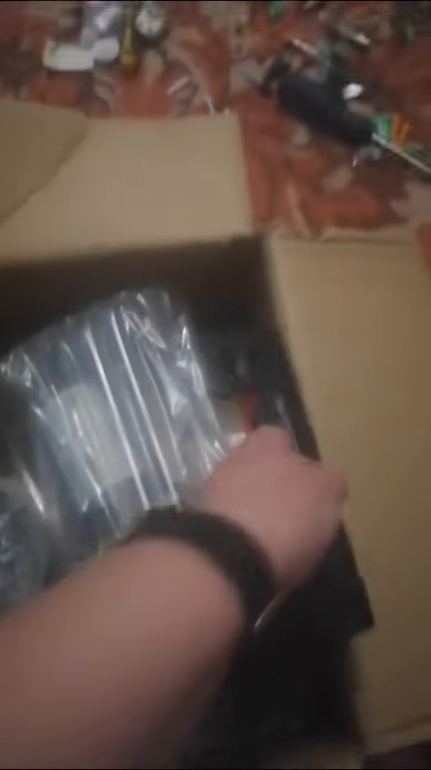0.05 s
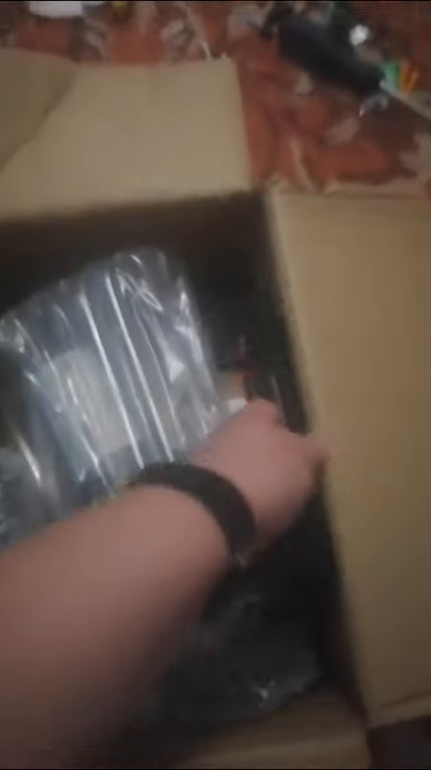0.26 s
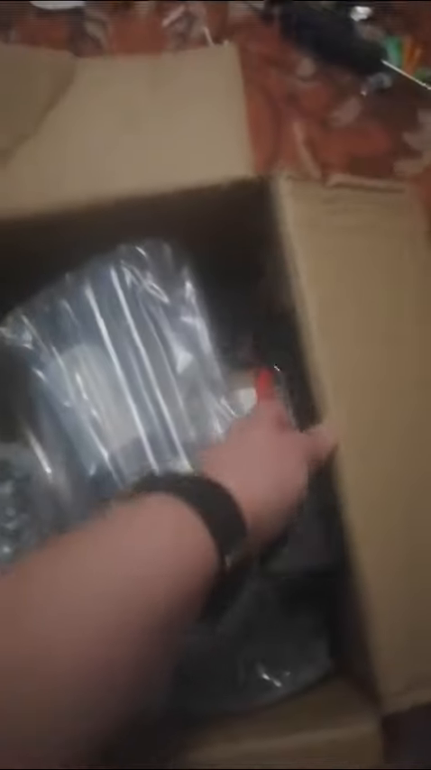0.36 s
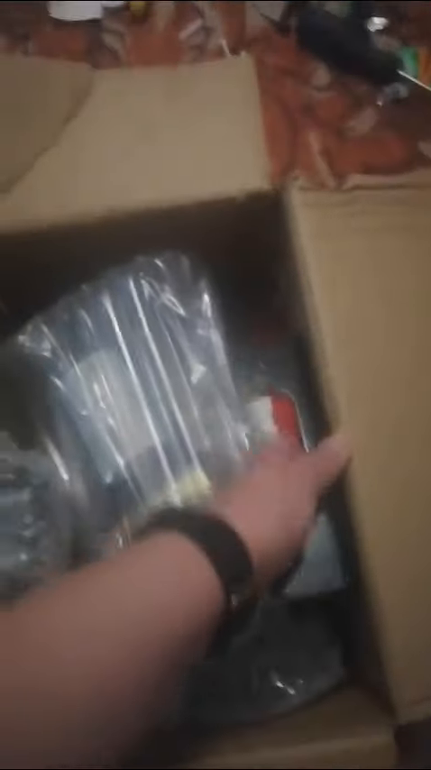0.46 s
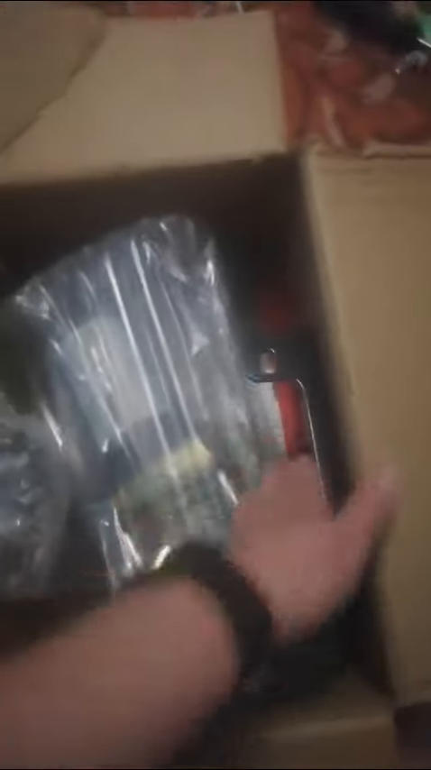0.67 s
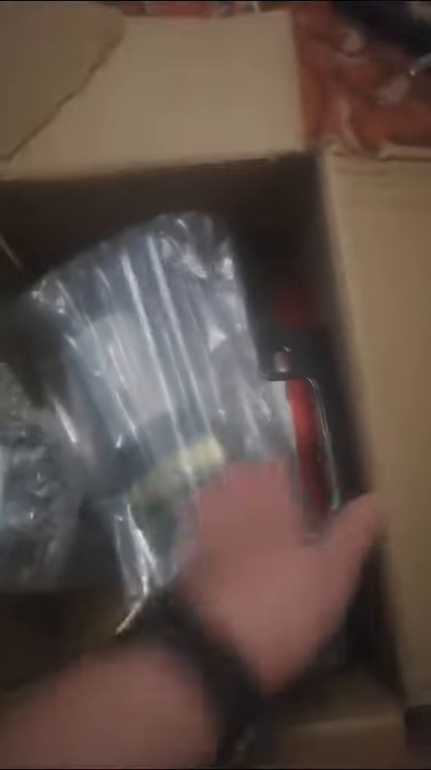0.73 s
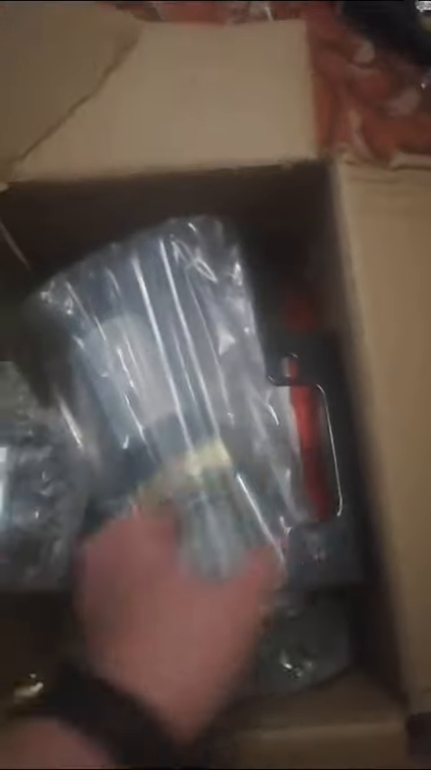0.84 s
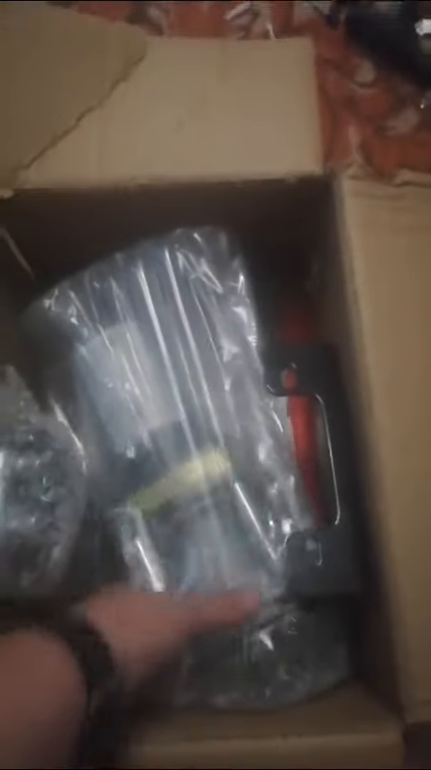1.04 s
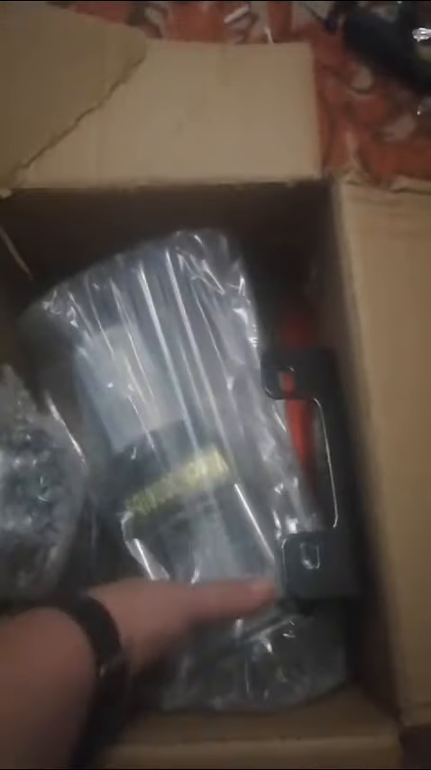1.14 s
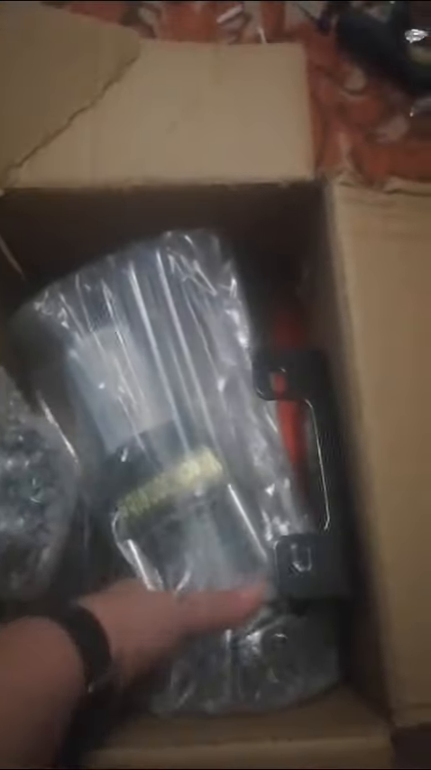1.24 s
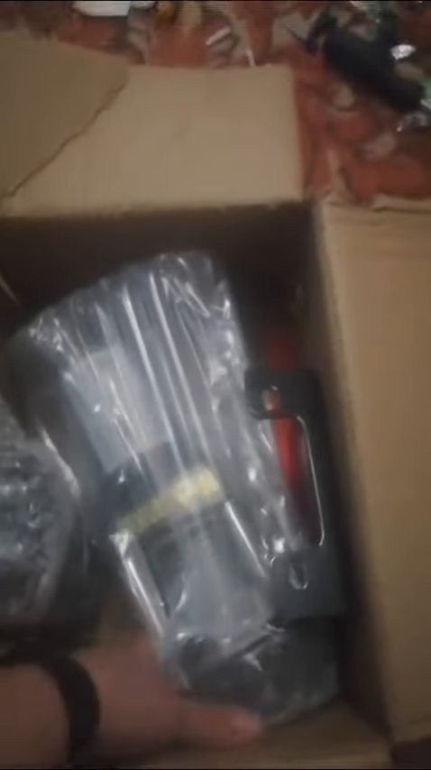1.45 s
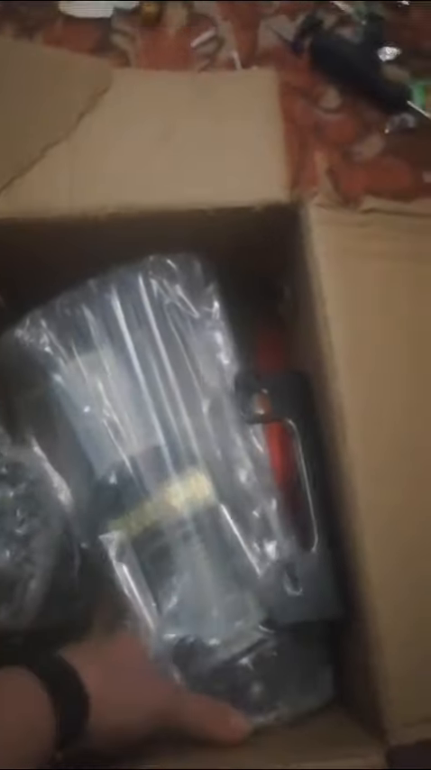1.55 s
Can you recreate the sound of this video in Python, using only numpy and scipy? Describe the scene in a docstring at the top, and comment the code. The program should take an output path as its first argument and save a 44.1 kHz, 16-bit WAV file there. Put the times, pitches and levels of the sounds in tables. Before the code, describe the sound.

Cardboard box knocked by a hand: hollow thumps first, the heaviest followed by a sharp crack and short metal clink, then plastic film rustling and snapping, close stereo microphone in a small quiet room.

```python
"""In a quiet room, a hand shifts wrapped goods in a cardboard box close to a two-port microphone.
A faint low sine swells and fades over steady filtered-noise air. Clumped random clicks through filter
banks make film rustle and card rub. Blows ring the box walls and crack as noise bursts, coloured bursts
make short film snaps and one light knock, and a metal part clinks as ringing modes. Feedback delays
answer the hits."""
import sys
import numpy as np
from scipy import signal
from scipy.fft import rfft, irfft, next_fast_len
from scipy.io import wavfile

SR = 44100
rng = np.random.default_rng(int(sys.argv[2]) if len(sys.argv) > 2 else 0)


def boost_factor(decibels):
    """Convert a level in decibels to a linear amplitude factor."""
    exponent = np.asarray(decibels, float) / 20
    return 10 ** exponent


def store_pcm(level_fs):
    """Save levels as 16-bit WAV."""
    pcm = np.round(np.clip(level_fs, -1, 1) * 32767).astype(np.int16)
    wavfile.write(sys.argv[1], SR, np.atleast_2d(pcm).T)


N = 70560  # samples, 1.6 s


def rms_one(x):
    """Scale to rms 1."""
    return x / np.sqrt(np.mean(x ** 2) + 1e-20)


def in_time(rows):
    """Read the columns of a time curve at every sample."""
    seconds, *columns = np.transpose(rows)
    return [np.interp(np.arange(N) / SR, seconds, column) for column in columns]


def at_hz(points, hz):
    """Read a spectrum on a log frequency axis."""
    point_hz, values = np.array(points).T
    return np.interp(np.log(hz), np.log(point_hz), values)


def drift(corner_hz):
    """Slow random wander with rms 1: noise through two equal low-pass poles."""
    pole = np.exp(-2 * np.pi * corner_hz / SR)
    noise = rng.standard_normal(2 * N)
    settled = signal.lfilter([1], [1, -2 * pole, pole * pole], noise)[N:]
    return rms_one(settled)


def band_pass(x, low_hz, high_hz):
    """Keep what lies between two frequencies."""
    return signal.sosfilt(signal.butter(2, [low_hz, high_hz], "band", fs=SR, output="sos"), x)


def ring(clicks, hz, t60_s):
    """A damped mode: a unit click starts a decaying sine of height 1."""
    radius = boost_factor(-60 / (t60_s * SR))
    w = 2 * np.pi * hz / SR
    return signal.lfilter([0, np.sin(w)], [1, -2 * radius * np.cos(w), radius ** 2], clicks + 1e-18)


def burst(t60_s, hz, q):
    """Dying noise through one broad resonance, peak 1, drawn separately for each port."""
    fade = boost_factor(-60 * np.arange(2048) / SR / t60_s)
    noise = rng.standard_normal((2, 2048)) * fade
    out = signal.lfilter(*signal.iirpeak(hz, max(q, 3 * hz / SR), fs=SR), noise)
    return out / np.abs(out).max()


def add(out, start_s, sound):
    """Mix a short stereo sound in at its start time."""
    i = int(start_s * SR)
    out[:, i:i + sound.shape[1]] += sound[:, :N - i]


def grains(per_s, spread_db, clump_db):
    """Random clicks of uneven size, in two pairs of draws that thicken and swell in the same clumps."""
    clump = boost_factor(clump_db * drift(60.0))
    sizes = boost_factor(spread_db * np.minimum(rng.exponential(1, (2, 2, N)), 4))
    signs = rng.choice([-1, 1], (2, 2, N))
    born = rng.random((2, 2, N)) < per_s * clump / SR
    return clump * sizes * signs * born + 1e-18


# Left-right likeness of the noisy sounds. Each row: frequency in Hz, likeness (1 is the same in both).
LEFT_RIGHT_LIKENESS = [(30, 0.5), (250, 1), (800, 0.023), (16000, 0.007)]


def bands(spectrum, source, patchy_db):
    """Band-pass bank that gives noise or grains a spectrum, per-band flicker and stereo width; rms 1."""
    out = 0
    edges = np.geomspace(25, 17000, num=26)
    flicker = [drift(17.0) for _ in range(5)]
    for k, (low, high) in enumerate(zip(edges, edges[1:])):
        hz = np.sqrt(low * high)
        mid, side = band_pass(source[k % 2], low, high)  # neighbouring bands use different draws
        alike = np.clip(at_hz(LEFT_RIGHT_LIKENESS, hz), -1, 1)
        stereo = np.sqrt(1 + alike) * mid + np.sqrt(1 - alike) * side * [[1], [-1]]
        out = out + boost_factor(at_hz(spectrum, hz) + patchy_db * flicker[k % 5]) * stereo
    return rms_one(out)


# Faint low tone that swells and fades. Each row: time in seconds, frequency in Hz, rms level in dB.
TONE_CURVE = [(0, 251, -58), (.045, 266, -60), (.085, 257.6, -52), (.13, 268, -65), (.19, 248, -101)]


def low_tone():
    """A sine of gliding pitch, its phase the running sum of its frequency, dies away."""
    hz, db = in_time(TONE_CURVE)
    return np.sqrt(2) * boost_factor(db) * np.sin(2 * np.pi * np.cumsum(hz) / SR)


# Colour of the quiet air. Each row: frequency in Hz, relative level in dB per Hz.
AIR_SPECTRUM = [(60, 18), (450, -46), (1800, -51), (3100, 4), (5000, 2.5), (16000, -25.5)]


def air():
    """Steady random noise, coloured band by band, with a slight flicker."""
    level_db = -66.5  # rms
    return boost_factor(level_db) * bands(AIR_SPECTRUM, rng.standard_normal((2, 2, N)), patchy_db=1.5)


# Movement of the hand. Each row: time in seconds, film rustle rms in dB, card rub rms in dB.
HAND_MOVES = [(.22, -69, -64.5), (.34, -56.5, -45), (.42, -43.5, -42), (.47, -51, -38), (.57, -58, -47),
              (.66, -43.5, -33.5), (.70, -44, -36.5), (.78, -65, -47.5), (.91, -50, -50.5), (.96, -61, -48),
              (1.0, -64.5, -64.5), (1.07, -63.5, -57), (1.12, -50, -54.5), (1.2, -46, -45.5),
              (1.31, -45, -56), (1.365, -55, -49.5), (1.39, -39.5, -47), (1.44, -51.5, -53.5),
              (1.49, -40.5, -49), (1.6, -54, -51.5)]
# Colour of the rustling film. Each row: frequency in Hz, relative level in dB per Hz.
FILM_SPECTRUM = [(900, 10), (1500, 6.5), (2400, 13), (3600, 1.5), (5000, 8), (8200, 4), (10900, -1.5),
                 (15000, -0.5)]
# Colour of card rubbing on card. Each row: frequency in Hz, relative level in dB per Hz.
CARD_SPECTRUM = [(60, -19), (110, -5), (370, 4), (900, -6.5), (2500, -34.5)]


def rubbing():
    """Film rustles and card rubs as the hand moves: many tiny clicks, each material with its colour."""
    film_db, card_db = in_time(HAND_MOVES)
    film_grains = grains(per_s=4000, spread_db=4, clump_db=2)
    card_grains = grains(per_s=1500, spread_db=3, clump_db=2)
    film = bands(FILM_SPECTRUM, film_grains, patchy_db=0.5)
    card = bands(CARD_SPECTRUM, card_grains, patchy_db=3.5)
    return boost_factor(film_db) * film + boost_factor(card_db) * card


# Blows on the box. Each row: start in seconds, strike level on the walls in dB,
# pitch the walls favour in Hz, crack level in dB.
BOX_BLOWS = [(0.23, -18.5, 197.4, -28), (.286, -23.5, 190, -36.5), (.309, -6.5, 153.6, -20.5),
             (0.487, -17, 199, -28.5), (0.6016, 0.5, 127.8, -21), (0.6087, -22, 253, -22),
             (.654, -28, 252, -32), (0.685, -16, 400, -12.5), (0.7251, -24, 522, -26),
             (1.088, -30, 400, -22), (1.109, -30, 424, -27), (1.1131, -32, 335, -24.5),
             (1.207, -33, 575, -35)]
# Modes of the box walls. Each row: frequency in Hz, relative level in dB, 60 dB decay time in seconds.
WALL_MODES = [(147.5, -24, 0.096), (156.8, -10, 0.16), (191.6, 0.5, 0.16), (256.3, -2, 0.18),
              (309.6, 4, 0.071), (400, -1.5, 0.026), (490, -1, 0.047), (618, -1.5, 0.046), (777, 2, 0.024)]


def box():
    """Each blow rings the wall modes nearest its pitch most, and cracks at the contact."""
    favour_db_per_oct2, favour_floor_db, mode_spread_db = 134, -24, 2
    wall_low_hz, contact_hz = 111.5, 1050  # range the wall ring keeps
    crack_t60_s, crack_hz, crack_top_hz = 0.027, 930, 4080
    start_s, strike_db, pitch_hz, crack_db = np.transpose(BOX_BLOWS)
    chance = rng.standard_normal((len(start_s), len(WALL_MODES)))

    walls = np.zeros(N)
    for k, (hz, mode_db, t60_s) in enumerate(WALL_MODES):
        octaves_off = np.log2(hz / pitch_hz)
        favour_db = np.maximum(-favour_db_per_oct2 * octaves_off ** 2, favour_floor_db)
        clicks = np.zeros(N)
        click_db = strike_db + mode_db + favour_db + mode_spread_db * chance[:, k]
        clicks[(start_s * SR).astype(int)] = boost_factor(click_db)
        walls -= ring(clicks, hz, t60_s)
    walls = band_pass(walls, wall_low_hz, contact_hz)

    cracks = np.zeros((2, N))
    for s, db in zip(start_s, crack_db):
        add(cracks, s, boost_factor(db) * burst(crack_t60_s, crack_hz, q=0.55))
    cracks = signal.lfilter(*signal.butter(1, crack_top_hz, fs=SR), cracks)
    return walls + cracks


# Short snaps of film, and one light knock at 0.864 s.
# Each row: start in seconds, level of the coloured burst in dB, its pitch in Hz.
SNAPS_AND_KNOCK = [(0.557, -26.5, 4750), (0.671, -22.5, 7450), (0.864, -35.5, 2130), (1.264, -28.5, 7740),
                   (1.278, -27, 7800), (1.298, -25.5, 2240), (1.31, -22, 5220), (1.38, -32.5, 7160),
                   (1.399, -35, 13900), (1.461, -25, 14200), (1.475, -20.5, 7800), (1.494, -24.5, 5070),
                   (1.497, -36, 4960), (1.508, -24, 14100)]


def snaps_and_knock():
    """Short snaps of film, and one light knock at 0.864 s: a coloured burst over a broad one."""
    t60_s, broad_db = 0.0079, -16  # broad burst relative to the coloured one
    out = np.zeros((2, N))
    for start_s, db, hz in SNAPS_AND_KNOCK:
        coloured = burst(t60_s, hz, q=3)
        broad = boost_factor(broad_db) * burst(t60_s, 5400, q=0.47)
        add(out, start_s, boost_factor(db) * (coloured + broad))
    return out


# Strikes on the metal part. Each row: start in seconds, level in dB.
METAL_STRIKES = [(0.6844, -28), (0.6915, -58)]
# Modes of the metal part. Each row: frequency in Hz, relative level in dB, 60 dB decay time in seconds.
METAL_MODES = [(2430, 10, .022), (1992, -9, .21), (4457, -14, .17), (4538, -5, .12), (5006, -9, .12),
               (5120, -8, .13), (7171, -15, .17), (7838, -8, .11), (10400, -21, .17), (12720, -23, .25)]


def metal():
    """Two quick strikes set the metal modes ringing; each ring wavers as the part rocks."""
    wobble_db, wobble_hz = 3, 30
    clicks = np.zeros(N)
    for start_s, db in METAL_STRIKES:
        clicks[int(start_s * SR)] = boost_factor(db)
    out = np.zeros(N)
    for hz, db, t60_s in METAL_MODES:
        out += boost_factor(db + wobble_db * drift(wobble_hz)) * ring(clicks, hz, t60_s)
    return out


def room(x):
    """Eight feedback delays a side, duller with each pass; little bass comes back."""
    t60_s, low_cut_hz, wall_cut_hz = 0.2, 400, 8800  # the treble dies sooner than t60_s
    x = signal.sosfilt(signal.butter(2, low_cut_hz, "high", fs=SR, output="sos"), x)
    n = next_fast_len(N + SR)
    w = 2 * np.pi * np.arange(n // 2 + 1) / n
    dull = 1 / (1 + 1j * w * SR / (2 * np.pi * wall_cut_hz))
    response = np.zeros((2, n // 2 + 1), complex)
    for k, lag in enumerate(rng.uniform(0.0045, 0.035, size=16) * SR):
        loop = boost_factor(-60 * lag / SR / t60_s) * dull * np.exp(-1j * w * lag)
        response[k % 2] += loop / (1 - loop) * (-1) ** (k // 2)  # sides and signs alternate
    return irfft(response * rfft(x.mean(axis=0), n), n)[:, :N]


def scene():
    """Low tone, air and rubbing, with the hits and their room."""
    background = low_tone() + air() + rubbing()
    hits = box() + snaps_and_knock() + metal()
    return background + hits + boost_factor(-14.5) * room(hits)


# Colour difference of the two ports. Each row: frequency in Hz, left minus right in dB.
PORT_LEAN = [(380, -4), (700, -5), (1300, 1), (2400, -5.5), (4400, -5.5), (8100, 12), (14000, -4.5)]


def microphone(x):
    """The ports differ in colour and share a shallow notch."""
    notch_hz = 3810
    hz = np.arange(1, N // 2 + 2) * SR / N
    lean_db = at_hz(PORT_LEAN, hz) / 2
    x = irfft(rfft(x) * boost_factor(np.array([lean_db, -lean_db])), N)
    return x - 0.5 * signal.lfilter(*signal.iirpeak(notch_hz, 6.0, fs=SR), x)


def roll_off(x):
    """The treble ends steeply here."""
    return signal.sosfilt(signal.butter(12, 16630, fs=SR, output="sos"), x)


def record(dry):
    """The two-port microphone picks up the scene."""
    mix = microphone(dry)
    return roll_off(mix)


dry = scene()
out = record(dry)
store_pcm(out)
```